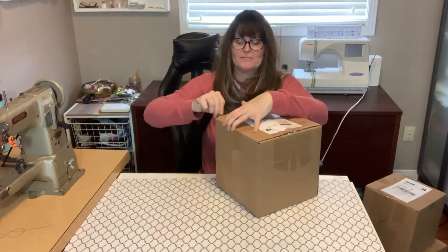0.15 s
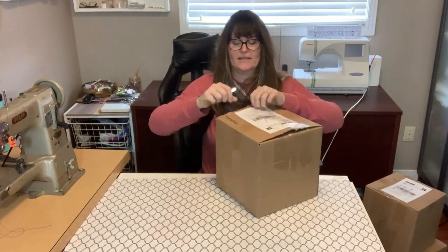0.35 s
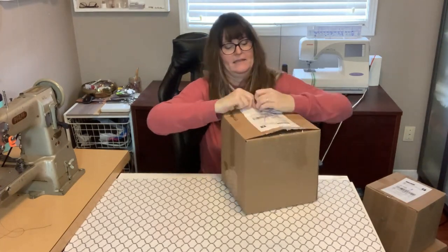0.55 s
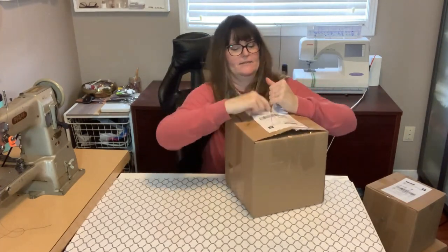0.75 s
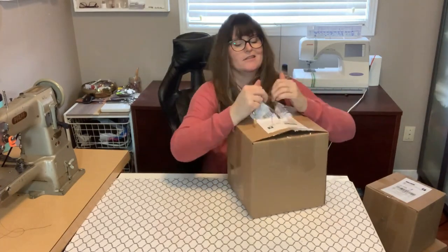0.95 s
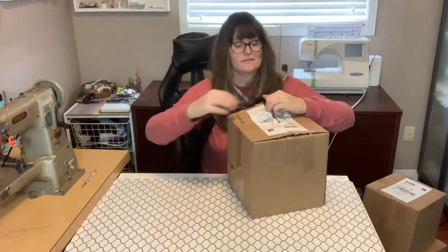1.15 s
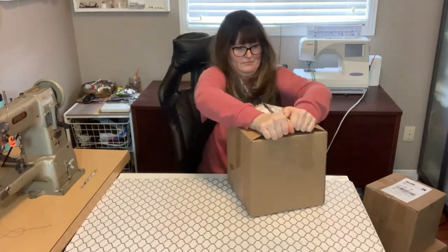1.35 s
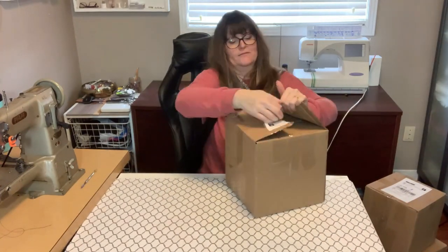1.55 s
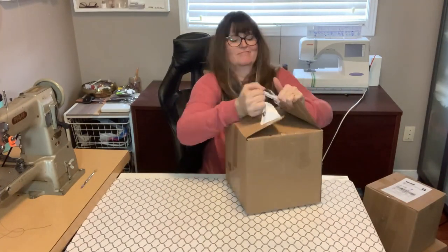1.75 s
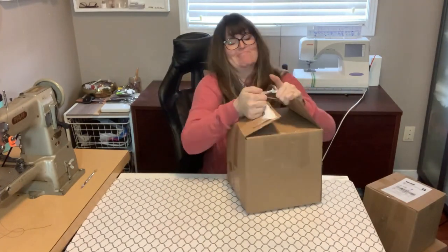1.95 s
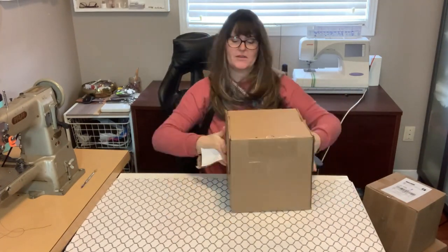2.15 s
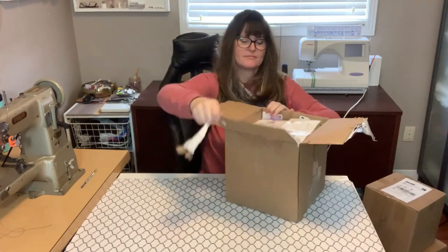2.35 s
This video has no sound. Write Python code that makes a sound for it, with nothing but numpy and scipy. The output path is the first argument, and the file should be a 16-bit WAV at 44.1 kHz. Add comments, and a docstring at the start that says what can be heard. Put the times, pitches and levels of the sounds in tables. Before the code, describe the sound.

Tape pulls away from a cardboard box, starting with small squeaks, then sharp snaps, short rips and more squeaks. The cardboard rustles and its flaps knock lightly. Two microphones catch it in a small room with faint hiss.

```python
"""Peeling packing tape off a cardboard box

The taut film snaps in sharp cracks, and released flaps knock as they spring back.
The glue lets go in short squeaks, a stick-slip oscillation. Between them the paper liner rips and
the rubbed cardboard rustles, its sound briefly ducked four times by a noise suppressor.
Two spaced microphones hear it in a small room, over a faint hiss."""
import sys
import numpy as np
from scipy import signal
from scipy.fft import rfft, irfft
from scipy.io import wavfile

SR = 44100
rng = np.random.default_rng(int(sys.argv[2]) if len(sys.argv) > 2 else 0)


def put_to_file(sound):
    """Save the sound as 16-bit audio at rate SR, in the file named by the first command-line argument."""
    columns = np.atleast_2d(sound).T  # one column per channel
    safe = np.clip(columns, -1, 1)
    whole_steps = np.round(safe * 32767)
    wavfile.write(sys.argv[1], SR, whole_steps.astype(np.int16))


N = 110250
TIME = np.arange(N) / SR
SIDES = np.array([[.5], [-.5]])  # splits a difference between the left and right microphones
SLIP_ATTACK_S, SLIP_RELEASE_S, SLIP_SAG_DB = 0.0029, 0.0036, 5


def cracks():
    """Brittle fracture: fibres give under strain, then an impulse sets off a decaying burst of noise."""
    # cracks of tape and cardboard: t/s, level/dB, hold/ms, bass gain/dB, treble gain/dB
    fractures = [(0.1809, -34, 3.1, 5, 3.5), (0.32, -29.5, 2.9, 0.5, -4.5), (0.338, -34.5, 3.1, -15, -7),
                 (0.4075, -29.5, 2.2, -6.5, -10.5), (0.4993, -13, 2.2, -10, -6.5),
                 (.504, -16.5, 1.8, -2.5, -10), (.512, -37, 0.84, -2, 6.5), (0.5708, -34, 1.4, -0.5, -3),
                 (.581, -42, 1.4, 11, 8.5), (0.5989, -23, 2.2, -4.5, -5), (0.6977, -26, 1.6, -10, -9),
                 (.741, -21, 1.9, -2, -1.5), (0.7614, -16, 1.1, -19, -21), (0.7807, -26, 0.8, 4, 2),
                 (0.9253, -26, 3, -3, -4.5), (.934, -33.5, 4.4, 9.5, 9.5), (0.9396, -18, 0.4, 8.5, -2),
                 (0.9625, -28, 0.55, 1, 4), (0.97, -22.5, 0.65, 5, 7), (0.974, -25.5, 0.36, 8, 7.5),
                 (0.9848, -29.5, 0.66, -11, 11), (0.9894, -19, 2.1, 5.5, 4.5), (1.003, -24.5, 0.6, 7.5, 1),
                 (1.0084, -24.5, 0.79, -5, 5.5), (1.2159, -37, 2.3, 2.5, 4.5),
                 (1.256, -29.5, 0.9, -4, -0.5), (1.3204, -25, 0.89, -1, -14), (1.3234, -20.5, 2.34, 4, 1),
                 (1.4268, -39.5, 1.2, 3.5, 2.5), (1.4565, -18, 2.3, 4, 2), (1.513, -37.5, 0.7, 10, 11.5),
                 (1.777, -48, 1.2, 15.5, 8), (1.8098, -43, 1.1, 14.5, 9.5), (1.829, -41, 2.3, 8.5, 8),
                 (1.8667, -17.5, 3.15, 1, 5.5), (1.98, -40, 3.2, 9.5, 8), (2.1082, -15, 0.86, -2, 1),
                 (2.2109, -28, 1.8, 5.5, 1.5), (2.228, -27.5, 1.6, -12, -11), (2.3278, -32, 1.8, -18, -17)]
    # spectrum of a crack: f/Hz, relative level/dB
    spectrum = [(30, -8), (100, -2.5), (400, -1), (700, 1.5), (1200, -2), (2000, 0), (2800, 4), (4500, 2),
                (9000, 0.5), (15000, 2.5)]
    strain_db, strain_ms, decay_ms = -11.5, 1.36, 3.58
    spike_db, scatter_db = 13.5, 1.5
    shared = 0.081  # share of the noise power common to both microphones
    out, size = np.zeros((2, N)), 4096
    lead = size // 8
    ms = (np.arange(size) - lead) * 1000 / SR
    strain = amp(strain_db) * np.exp(-abs(ms) / strain_ms)
    for start, db, hold_ms, bass_db, treble_db in fractures:
        envelope = np.where(ms < 0, strain, np.exp(-np.maximum(ms - hold_ms, 0) / decay_ms))
        lumps = np.repeat(rng.standard_normal(size // 16), 16)
        noise = np.sqrt(1 - shared) * rng.standard_normal((2, size))
        noise += np.sqrt(shared) * rng.standard_normal(size)
        burst = unit(noise * amp(scatter_db * lumps)) * envelope
        burst[:, lead + 2] += amp(spike_db) * rng.choice([-1, 1], 2)
        bass, treble = lowpass(burst, hz=1250), burst - lowpass(burst, hz=5830)
        burst += (amp(bass_db) - 1) * bass + (amp(treble_db) - 1) * treble
        i = int(start * SR) - lead
        out[:, i:i + size] += amp(db) * burst[:, :N - i]
    return colour(out, spectrum)


def squeaks():
    """Stick-slip oscillation: the glue gives a gliding harmonic tone and a pulse of rasp each cycle."""
    # squeaks: t/s, length/s, first, middle and last f/Hz, level/dB of partials 1, 2, 3, rasp level/dB
    slips = [(.024, 0.031, 3518, 3720, 3210, -47, -55.5, -77, -46),
             (0.207, .017, 3065, 3186, 3160, -53, -41, -35, -37.5),
             (.233, 0.0054, 2850, 2865, 2770, -32.5, -59, -58, -30),
             (0.2509, 0.011, 2768, 2610, 2470, -37.5, -25.5, -36.5, -35),
             (0.261, 0.0053, 3010, 2865, 2310, -33, -52, -57, -32.5),
             (0.272, 0.01, 3350, 3594, 3070, -35, -66, -65, -46),
             (0.289, 0.014, 3670, 3760, 3500, -43.5, -63, -66, -44),
             (0.453, 0.0081, 2580, 2720, 2650, -45, -35, -22.5, -28.5),
             (0.467, 0.0083, 2620, 2330, 2100, -43.5, -45, -46, -41),
             (.702, .014, 2760, 2993, 2840, -41, -26, -32.5, -36),
             (0.718, 0.018, 2830, 2680, 2440, -44.5, -45, -41, -49),
             (0.849, 0.04, 2770, 2460, 2280, -49, -69, -69, -46),
             (1.035, 0.016, 2673, 3237, 3310, -37, -48, -32, -35.5),
             (1.06, 0.0136, 2650, 2630, 2250, -40.5, -45, -49, -51),
             (1.081, 0.0093, 3030, 3220, 3320, -34, -34.5, -58, -34.5),
             (1.096, 0.0076, 3150, 3150, 3110, -33.5, -35, -53, -41),
             (1.116, .008, 3560, 3730, 3620, -35.5, -42, -46, -34),
             (1.124, .011, 3550, 3050, 2450, -36.5, -33, -36, -34),
             (1.142, 0.017, 2490, 2415, 2400, -46.5, -42, -46, -52),
             (1.164, 0.016, 3300, 3300, 3000, -35.5, -42.5, -40, -35.5),
             (1.179, 0.013, 2886, 2475, 2450, -41, -33, -46, -32),
             (1.192, .014, 2290, 2297, 2360, -38.5, -59, -42.5, -41),
             (1.582, 0.0093, 2860, 3025, 3050, -34.5, -54, -43, -40),
             (1.592, .006, 3180, 3124, 3000, -41, -25.5, -30.5, -34),
             (1.597, 0.012, 2684, 2753, 2750, -59, -52, -29, -35),
             (1.703, 0.014, 2526, 2775, 2820, -47.5, -37, -59, -46),
             (1.723, 0.011, 3980, 3504, 3340, -33, -59, -51, -38.5),
             (1.726, 0.0078, 4020, 4200, 4200, -28.5, -51, -43, -38),
             (1.907, 0.0086, 2550, 2500, 2380, -43.5, -66, -61, -41),
             (2.142, 0.012, 2700, 2640, 2500, -64, -45, -32.5, -35),
             (2.154, 0.012, 2520, 2490, 2410, -46.5, -39, -56, -36.5),
             (2.2364, 0.0044, 2520, 2716, 2820, -41, -37, -16, -29.5),
             (2.2414, 0.0037, 3040, 2894, 2820, -32, -32, -26, -25),
             (2.258, .016, 2540, 2246, 2040, -48.5, -43.5, -46, -50)]
    # spectrum of the friction noise: f/Hz, relative level/dB
    rasp_spectrum = [(200, 1.5), (800, 2.5), (1800, 2.5), (3000, 5.5), (4300, 4.5), (6000, 9), (9000, -1.5),
                     (12000, 6.5), (16000, -4)]
    flutter_db, grit_depth, firm_db = 1.5, .4, -30
    tone, rasp, size = np.zeros((2, N)), np.zeros((2, N)), 4096
    t = TIME[:size]
    jitter = .022 * wander(per_s=1000)
    flutter = np.array([[amp(flutter_db * wander(per_s=250)) * (1 + grit_depth * wander(per_s=1200))
                         for mic in range(2)] for harmonic in range(6)])
    for start, length, first_hz, middle_hz, last_hz, db1, db2, db3, rasp_db in slips:
        i = int(start * SR)
        span, envelope = slice(i, i + size), slip_envelope(t, length)
        progress = np.clip(t / (length + SLIP_RELEASE_S), 0, 1)
        glide_hz = np.polyval(np.polyfit([0, .5, 1], [first_hz, middle_hz, last_hz], 2), progress)
        looseness = np.sqrt(amp(firm_db - max(db1, db2, db3)))  # weak squeaks are rougher
        phase = 2 * np.pi * np.cumsum(glide_hz * (1 + looseness * jitter[span])) / SR
        upper_db = min(max(db2, db3) - 3.5, rasp_db) - 1.5 * np.arange(3)  # partials 4 to 6
        for n, (db, wobble) in enumerate(zip([db1, db2, db3, *upper_db], flutter), start=1):
            # the microphones are 0.54 rad apart at the fundamental
            offset = 2 * np.pi * rng.random() + n * 0.54 * rng.choice([-1, 1]) * SIDES
            partial = np.sin(n * phase + offset) * (n * glide_hz < SR / 2)
            tone[:, span] += np.sqrt(2) * amp(db) * envelope * wobble[:, span] * partial
        pulses = unit((1 + np.cos(phase)) * rng.standard_normal((2, size)))
        rasp[:, span] += amp(rasp_db) * envelope * pulses
    return tone + colour(rasp, rasp_spectrum)


def knocks():
    """Damped free vibration: a released flap pops or rings, its pitch sagging as the card relaxes."""
    # modes of the flaps: t/s, initial f/Hz, level/dB, T60/s, left minus right level/dB
    modes = [(.501, 753, -35.5, 0.056, -1), (0.499, 2600, -50, 0.019, -2), (1.3215, 970, -44, 0.027, 2),
             (1.4565, 2620, -15, 0.0087, 1), (1.4582, 1720, -27.5, 0.022, -4), (1.457, 854, -36, 0.046, 10),
             (1.867, 1840, -23.5, 0.019, 2), (2.1087, 3250, -3.5, 0.0019, 10),
             (2.1101, 760, -21, 0.014, -1), (2.113, 629, -40.5, 0.073, 0), (2.2415, 1880, -27, .017, 8)]
    sag = 0.13  # fractional drop of the mean frequency over one T60
    out = np.zeros((2, N))
    for start, hz, db, t60, pan_db in modes:
        age = np.maximum(TIME - start, 0)
        cycles = hz * age * (1 - sag * np.minimum(age / t60, 1))
        ring = np.sin(2 * np.pi * cycles + rng.uniform(0, 1, (2, 1))) * decay(age, t60)
        attack = np.clip(2 * hz * age, 0, 1)
        out += amp(db + pan_db * SIDES) * ring * attack
    return out


def rips():
    """Fibre rupture: the liner tears away with the tape in short runs of dense crackle."""
    # tears in the paper liner: t/s, length/s, level/dB
    tears = [(0.742, 0.038, -31), (0.936, 0.018, -35.5), (0.96, 0.036, -33.5), (1.708, 0.033, -29),
             (2.026, 0.042, -43)]
    # spectrum of tearing paper: f/Hz, relative level/dB
    spectrum = [(30, -6), (150, 4), (500, -0.5), (1200, 0.5), (2000, -5), (3000, 5), (6000, 1), (15000, 3)]
    envelope = sum(amp(db) * slip_envelope(TIME - start, length) for start, length, db in tears)
    return colour(crackle() * envelope, spectrum)


def rustle():
    """Sliding friction: a cardboard rustle swells and fades, ducked four times by a noise suppressor."""
    # rustle level, with the noise suppressor's dips near 0.13, 0.38, 0.84 and 1.37 s: t/s, level/dB
    ducked_levels = [(0, -37.5), (.02, -53), (.1, -50.5), (.125, -78), (.17, -62.5), (.195, -49),
                     (.335, -63), (.38, -66.5), (.43, -57), (.545, -54.5), (.65, -45.5), (.69, -54),
                     (.81, -43.5), (.838, -61.5), (.85, -42), (.91, -49), (1.02, -42), (1.06, -49.5),
                     (1.238, -52.5), (1.27, -47.5), (1.355, -45.5), (1.376, -64.5), (1.405, -48.5),
                     (1.56, -48), (1.76, -47), (1.82, -41), (1.895, -49.5), (1.92, -42), (2.01, -47),
                     (2.09, -52), (2.2, -45.5), (2.29, -49.5), (2.345, -48), (2.4, -48), (2.5, -56)]
    # spectrum of rubbed cardboard: f/Hz, relative level/dB
    spectrum = [(30, 0.5), (100, -4.5), (300, -4), (700, 1.5), (1200, -3.5), (2000, 1), (3200, 5),
                (5000, 1), (9000, -0.5), (15000, -1)]
    return colour(crackle() * gain_curve(ducked_levels), spectrum)


def room(x):
    """Reverberation: reflections merge into a short exponential tail in which the lows last longer."""
    t = TIME[:N // 4]
    onset = np.clip(t / 0.0027, 0, 1)
    bright = lowpass(rng.standard_normal((2, len(t))) * decay(t, t60=0.18) * onset, hz=5000)
    low = lowpass(rng.standard_normal((2, len(t))) * decay(t, t60=0.23) * onset, hz=520, order=2)
    response = (amp(-26) * unit(bright) + amp(-39.5) * unit(low)) / np.sqrt(len(t))
    return signal.fftconvolve(x, response, axes=1)[:, :N]


def hiss():
    """Noise floor: a faint hiss, uncorrelated between the microphones, that rises toward the end."""
    # envelope of the hiss: t/s, level/dB
    levels = [(0, -97), (.13, -74.5), (.4, -77), (.6, -90), (1.38, -74), (1.5, -65), (2.3, -69), (2.5, -57)]
    # spectrum of the hiss: f/Hz, relative level/dB
    spectrum = [(30, 20), (100, 9), (300, 22.5), (700, 15.5), (1600, 25), (3200, -17), (6000, 8),
                (10000, -6), (16000, -5)]
    return colour(rng.standard_normal((2, N)), spectrum) * gain_curve(levels)


def crackle():
    """Shot noise: random fibre snaps of uneven size over smooth rubbing, in two channels at rms 1."""
    snaps_per_s, spread_db, decay_s, rub_db = 800, 4.5, 0.001, 1.5
    snaps = rng.random(N) < snaps_per_s / SR
    sizes = amp(spread_db * np.minimum(rng.exponential(size=N), 5))
    power = signal.lfilter([1], [1, -np.exp(-2 / (decay_s * SR))], (snaps * sizes) ** 2)
    return unit((unit(np.sqrt(power)) + amp(rub_db)) * rng.standard_normal((2, N)))


def slip_envelope(t, length):
    """Amplitude envelope of one slip of the tape: linear rise, sagging hold, exponential release."""
    rise = np.clip(t / SLIP_ATTACK_S, 0, 1)
    sag = amp(-SLIP_SAG_DB * np.clip(t / length, 0, 1) ** 2)
    return rise * sag * np.exp(-np.maximum(t - length, 0) / SLIP_RELEASE_S)


def decay(t, t60):
    """Exponential damping by 60 dB in t60 seconds."""
    return np.exp(-np.log(1000) * t / t60)


def wander(per_s):
    """Random modulation at rms 1, interpolated between per_s values a second."""
    return unit(np.interp(TIME * per_s, np.arange(N // 8), rng.standard_normal(N // 8)))


def gain_curve(points):
    """Amplitude envelope interpolated through points of t/s, level/dB."""
    return amp(np.interp(TIME, *np.array(points).T))


def colour(x, points):
    """Minimum-phase filter through points of f/Hz, level/dB, scaled to keep the power of white noise."""
    hz, db = np.array(points, float).T
    size = 2 * N
    bin_hz = np.arange(N + 1) * SR / size
    gain = unit(amp(np.interp(np.log(bin_hz + 1), np.log(hz), db)))
    cepstrum = irfft(np.log(gain))
    cepstrum[1:N] *= 2  # folding onto positive time makes the filter causal
    cepstrum[N + 1:] = 0
    return irfft(rfft(x, size) * np.exp(rfft(cepstrum)))[..., :N]


def lowpass(x, hz, order=1):
    """Maximally flat low-pass filter."""
    return signal.sosfilt(signal.butter(order, hz, fs=SR, output="sos"), x)


def amp(db):
    """Amplitude ratio of a level in decibels."""
    return 10 ** (np.asarray(db) / 20)


def unit(x):
    """Normalisation to rms 1."""
    return x / np.sqrt(np.mean(x ** 2) + 1e-18)


def scene():
    """Superposition: the direct sound of tape and cardboard, its reverberation and the hiss."""
    pan_db = 0.5  # the tape lies slightly to the left
    direct = (rustle() + cracks() + rips() + knocks() + squeaks()) * amp(pan_db * SIDES)
    return direct + room(direct) + hiss()


def record(dry):
    """Frequency response: the left microphone favours upper mids, the right bass; the top is cut off."""
    # balance of the microphones: f/Hz, left minus right level/dB
    balance = [(500, -1.5), (1100, -1), (2400, 1.5), (5500, 0)]
    cutoff_hz = 16050
    heard = [colour(x, [(hz, side * db) for hz, db in balance]) for x, side in zip(dry, SIDES[:, 0])]
    return signal.sosfilt(signal.ellip(10, .1, 70, cutoff_hz, fs=SR, output="sos"), heard)


dry = scene()
out = record(dry)
put_to_file(out)
```